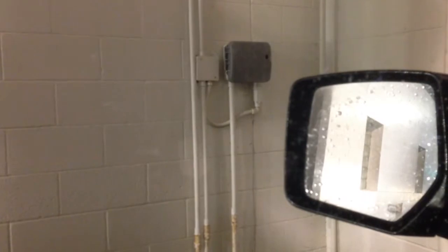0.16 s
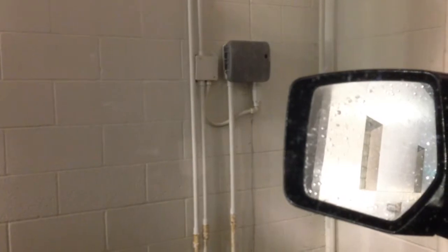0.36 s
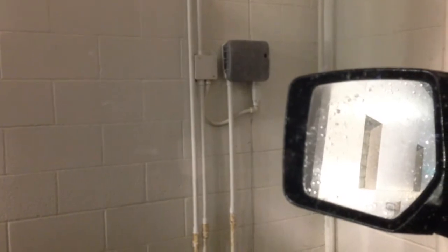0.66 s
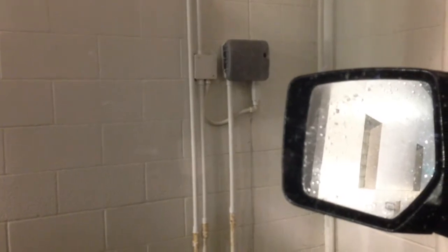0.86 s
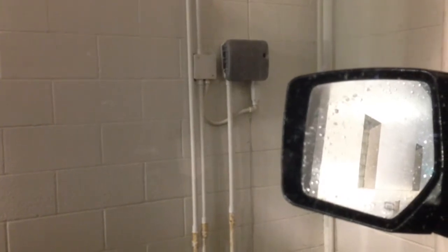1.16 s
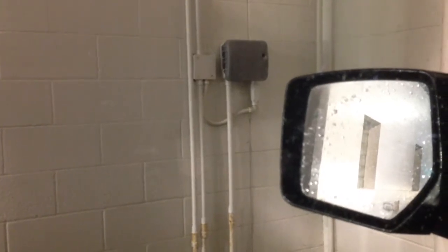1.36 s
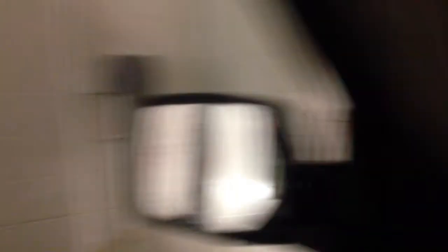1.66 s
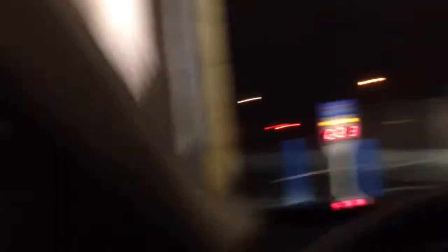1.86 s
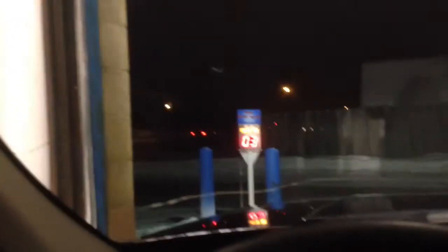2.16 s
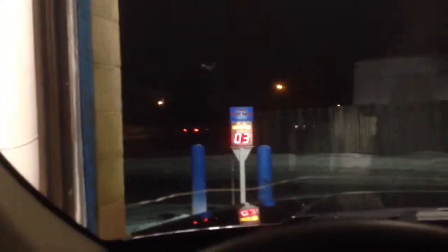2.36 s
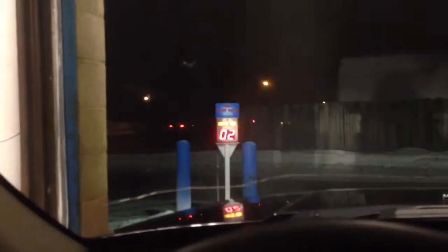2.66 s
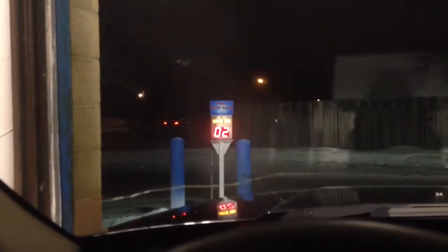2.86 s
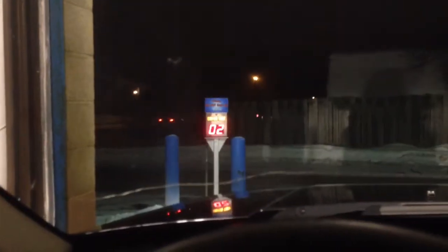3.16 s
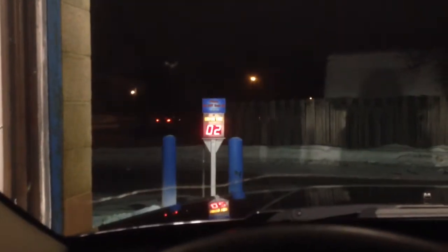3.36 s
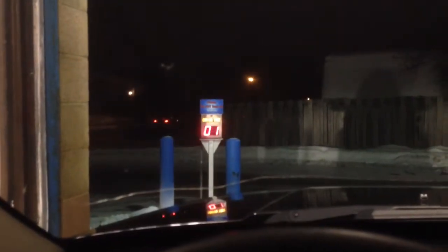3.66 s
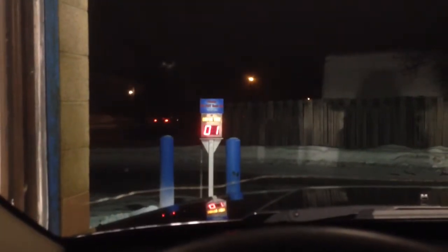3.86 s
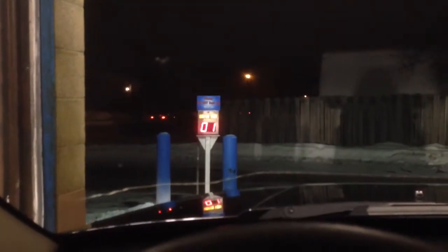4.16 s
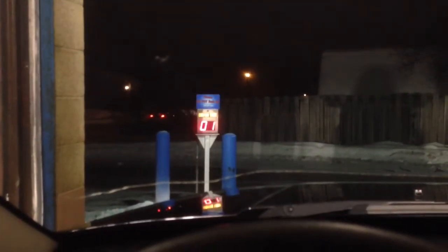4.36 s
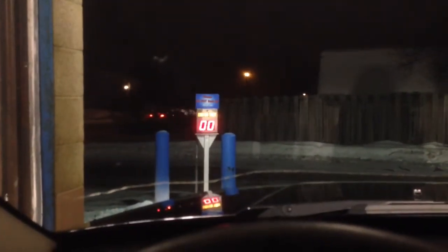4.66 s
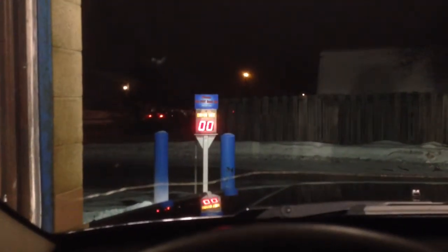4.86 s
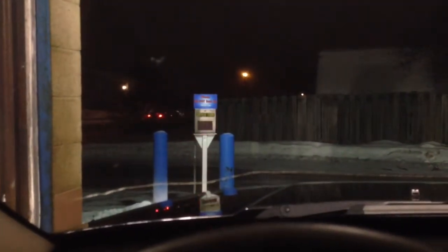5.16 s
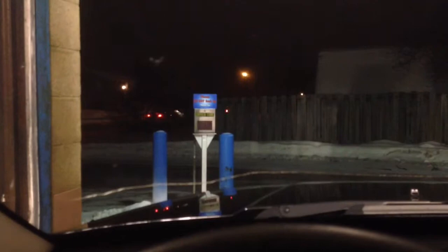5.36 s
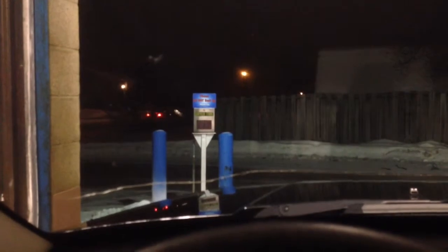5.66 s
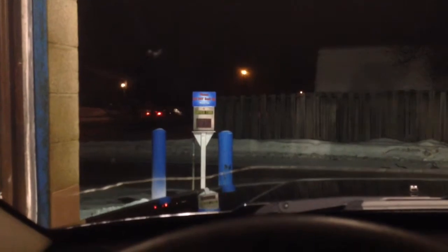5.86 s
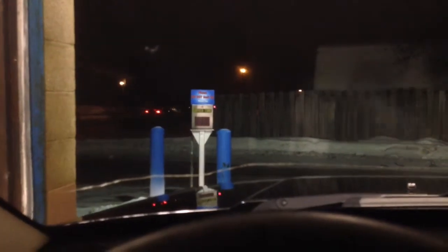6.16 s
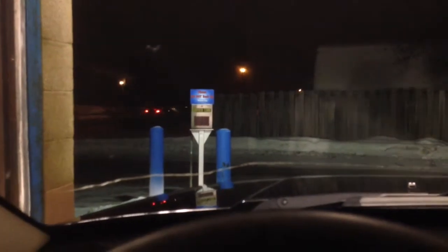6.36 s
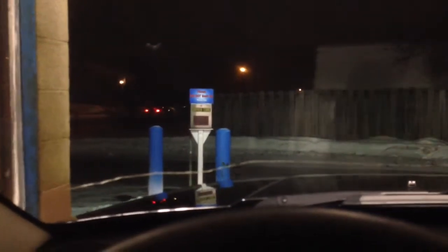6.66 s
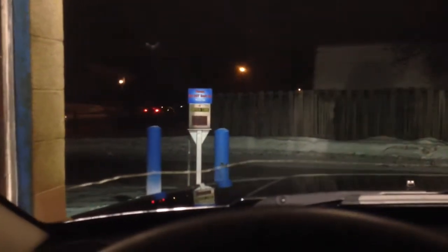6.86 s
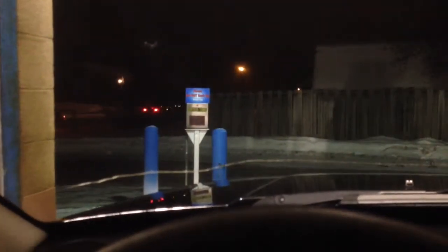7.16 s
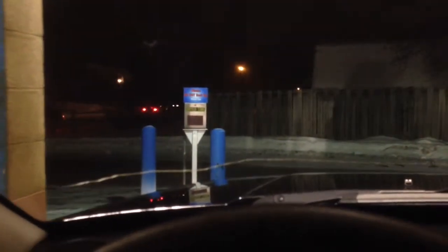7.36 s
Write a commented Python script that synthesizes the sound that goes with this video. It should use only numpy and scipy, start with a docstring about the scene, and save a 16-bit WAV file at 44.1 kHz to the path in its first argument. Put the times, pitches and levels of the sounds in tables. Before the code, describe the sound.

A continuous low-heavy blower roar in a small car cabin, bass throbbing loosely with short swells. Softer mid-range rushing, blurred blower whine and faint high hiss sit behind it, with tiny water drops ticking almost unnoticed. The tone changes briefly as the handheld microphone turns forward; later the car leaves the jets, the patter dies, the hiss dulls and the whole sound sinks without stopping.

```python
"""Air-dryer jets of a car wash buffet a car as it creeps out, heard from the driver's seat.
Buffeting: noise in the cabin modes, with short swells. Rush and seal hiss: coloured, fluttering noise.
Fan tones: narrow noise bands that flare. Blown drops: short noise bursts and a fine random patter.
The microphone swings from side window to windscreen; the rush changes colour, the hiss dulls, and both fade.
A faint even noise floor lies beneath; a limiter and a band limit follow."""
import sys
import numpy as np
from scipy import signal
from scipy.fft import rfft, irfft
from scipy.io import wavfile
from scipy.ndimage import uniform_filter1d, minimum_filter1d

SR = 44100
rng = np.random.default_rng(int(sys.argv[2]) if len(sys.argv) > 2 else 0)


def store_wav(level_fs):
    """Save 16-bit WAV to argv[1]."""
    pcm = np.round(np.clip(np.atleast_2d(level_fs), -1, 1) * 32767)
    wavfile.write(sys.argv[1], SR, pcm.T.astype(np.int16))


N = 330750

# Cabin and panel modes: (centre [Hz], width [Hz], side-window level [dB], windscreen level [dB])
CABIN_MODES = [(91.5, 21, -5.5, -11.5), (116.7, 13, 2.5, -1.5), (132.9, 14, 0.9, 2.3), (157.5, 16, 4, 1),
               (175.7, 26.3, -8, -3.5), (198.2, 14, -10, -11), (232, 45, -9, -30), (268, 63, -19.5, -33),
               (342.6, 42, -19, -31)]
# Loudest short swells of the boom: (centre [s], lift [dB])
BOOM_SWELLS = [(.04, 3.5), (.32, 7.5), (1.11, 3), (1.23, 5.5), (2.23, 5), (3.75, 5), (4.51, 8), (5.56, 2),
               (5.73, 5), (5.96, 4)]
# Lowest cabin mode and its skirts: (frequency [Hz], relative density [dB per Hz])
HEAVE_SPECTRUM = [(8, -38), (20, -25), (34, -19), (45, -8.5), (56, 1.5), (63, -8), (70, -7), (82, -4.5),
                  (105, -21.5), (200, -53.5)]
# Loudest short swells of the lowest cabin mode: (centre [s], lift [dB])
HEAVE_SWELLS = [(2.58, 12.5), (2.8, 7.5), (4.04, 8), (4.16, 8.5), (4.75, 8), (5.97, 7)]
# Rush through the side window: (frequency [Hz], relative density [dB per Hz])
SIDE_RUSH_SPECTRUM = [(120, -19.5), (280, 0), (400, -1.5), (580, 3), (660, -5), (760, -1), (1050, -8),
                      (1400, -7.5), (1780, -8), (2200, -15), (2700, -20), (3700, -29.5), (6000, -45.5)]
# Rush through the windscreen: (frequency [Hz], relative density [dB per Hz])
FRONT_RUSH_SPECTRUM = [(120, -8), (240, 2), (340, 3.5), (520, .5), (740, -2), (870, -7), (1020, -7),
                       (1120, -10.5), (1450, -9), (1780, -10.5), (2200, -17), (2700, -21), (3700, -26.5),
                       (6000, -52.5)]
# Windscreen rush once clear of the jets: (frequency [Hz], change [dB])
FAR_RUSH_CHANGE = [(250, 0.67), (420, 2), (600, -0.79), (1100, 0.84), (2500, 0.18), (8000, 0)]
# Fan tones and bay ringing: (centre [Hz], width [Hz], side-window level over rush [dB],
# windscreen level over rush [dB], gain once clear of the jets [dB])
FAN_TONES = [(320, 57, -8.5, -1.5, 3), (450.6, 28, 0.5, 3, 6), (515, 15, 0, 3.5, -1.5),
             (603, 21, 3.5, 0, .5), (756, 32, -6.5, -1, 1), (928, 22, -10, 6, 0.5), (989, 30, -13, -1, 6),
             (1197, 36, 5, 1.5, 3), (1292, 28, -12.5, -4.5, 7), (1379, 35, -2.5, -1.5, 0),
             (1552, 33, -4, 7.5, 1.5), (1688, 47, -1.5, 4.5, 1.5), (1802, 51, -.5, 2, 2.5),
             (2075, 87, -11, -4, 3), (3147, 53, -1, 7.5, -3.5), (3680, 71, 9, -7, 8)]
# Air at the window seals: (frequency [Hz], relative density [dB per Hz])
HISS_SPECTRUM = [(1500, -20), (2600, -2), (3200, 1.5), (3800, -0.5), (4300, -4), (5000, -6), (6000, -11.5),
                 (7000, -15.5), (8500, -21), (10000, -26.5), (12000, -35), (15000, -42)]
# Seal hiss once clear of the jets: (frequency [Hz], change [dB])
FAR_HISS_CHANGE = [(2000, -1.5), (4000, -4.0), (7000, -4.5), (16000, -8.0)]
# Drops splashing on the car: (onset [s], crest level [dB], spectral centre [Hz])
DROP_SPLASHES = [(1.285, -58, 6000), (1.733, -54, 5700), (2.584, -50, 6300), (3.027, -57.5, 7000),
                 (3.855, -57.5, 7530), (4.169, -58, 7600), (5.025, -51, 6100), (5.08, -62, 7500),
                 (5.401, -60, 7000), (5.473, -64, 9500), (5.743, -57, 6900)]
# One small hard tick in the cabin: (onset [s], crest level [dB], spectral centre [Hz], decay [s])
HARD_TICK = (5.993, -50, 6500, .003)
# Fine droplet patter: (frequency [Hz], relative density [dB per Hz])
SPRAY_SPECTRUM = [(2000, -17.5), (5000, 1.5), (9000, -0.5), (15000, -8.0)]

# Microphone swing; roll-out from under the jets; shading of the dryer by the doorway
TURN_START_S, TURN_LENGTH_S = 1.5, 0.45
LEAVE_START_S, LEAVE_LENGTH_S = 4.89, 1.33
DOOR_START_S, DOOR_LENGTH_S = 6.92, 0.31

# Per layer: base level, fade while rolling away, loss past the doorway
BOOM_DB, BOOM_FADE_DB_PER_S, BOOM_DOOR_LOSS_DB = -16, 3, 2.5
HEAVE_DB, HEAVE_FADE_DB_PER_S, HEAVE_DOOR_LOSS_DB = -24.5, 0.8, 1
RUSH_DB, RUSH_FADE_DB_PER_S, RUSH_DOOR_LOSS_DB = -34, 2.5, 1
FANS_DB, FANS_FADE_DB_PER_S, FANS_DOOR_LOSS_DB = -33.5, 2.5, 9
HISS_DB, HISS_FADE_DB_PER_S, HISS_DOOR_LOSS_DB = -49.5, 3, -0.1
FLOOR_DB = -67.5

RUSH_FRONT_GAIN_DB, FANS_FRONT_GAIN_DB = 3.5, 3  # windscreen over side window
FAN_FLARE_DB = 1.6
BOOM_SWELL_LENGTH_S, HEAVE_SWELL_LENGTH_S = 0.063, 0.09
LONG_SWELL_CENTRE_S, LONG_SWELL_LENGTH_S, LONG_SWELL_DB = 4.3, 0.42, 2.2  # before leaving the jets
DROP_RISE_S, DROP_DECAY_S, DROP_OCTAVES = 0.005, 0.011, 0.61
SPRAY_DECAY_S = 0.0055  # decay of the power
CEILING_DB, LIMITER_S, BAND_EDGE_HZ = -3, 0.02, 15300


def boom(hz):
    """Buffeting drives the cabin modes; each place in the cabin hears its own mix of them."""
    side_power = sum(gain_of(db) ** 2 * bell(hz, f, w) for f, w, db, _ in CABIN_MODES)
    front_power = sum(gain_of(db) ** 2 * bell(hz, f, w) for f, w, _, db in CABIN_MODES)
    side = noise(np.sqrt(side_power))
    front = noise(np.sqrt(front_power))
    modes = sustained(blend(side, front, facing()), seconds=0.09, share=0.52)
    short_swells_db = swells(BOOM_SWELLS, BOOM_SWELL_LENGTH_S)
    long_swell_db = swells([(LONG_SWELL_CENTRE_S, LONG_SWELL_DB)], LONG_SWELL_LENGTH_S)
    throb_db = throb(hz, rate_hz=5, width_hz=3.8, depth_db=0.77)
    distance_db = receding(BOOM_FADE_DB_PER_S, BOOM_DOOR_LOSS_DB)
    return gain_of(BOOM_DB + short_swells_db + long_swell_db + throb_db + distance_db) * modes


def throb(hz, rate_hz, width_hz, depth_db):
    """Level change in dB: the jets flap against the body in a loose rhythm."""
    return depth_db * noise(np.sqrt(bell(hz, rate_hz, width_hz)))


def heave(hz):
    """The whole cabin's air heaves in its lowest mode, with a few short swells."""
    air = sustained(noise(read(HEAVE_SPECTRUM, hz)), seconds=0.18, share=1.0)
    swells_db = swells(HEAVE_SWELLS, HEAVE_SWELL_LENGTH_S)
    distance_db = receding(HEAVE_FADE_DB_PER_S, HEAVE_DOOR_LOSS_DB)
    return gain_of(HEAVE_DB + swells_db + distance_db) * air


def rush(hz):
    """The jets' roar through the glass the microphone faces; its colour shifts slightly on leaving."""
    near_gain = read(FRONT_RUSH_SPECTRUM, hz)
    far_gain = near_gain * read(FAR_RUSH_CHANGE, hz)
    front = blend(noise(near_gain), noise(far_gain), leaving())
    side = noise(read(SIDE_RUSH_SPECTRUM, hz))
    roar = blend(side, gain_of(RUSH_FRONT_GAIN_DB) * front, facing())
    level_db = RUSH_DB + receding(RUSH_FADE_DB_PER_S, RUSH_DOOR_LOSS_DB)
    return gain_of(level_db) * eddies(roar, patchy_db=0.94, overall_db=0.3)


def fans(hz):
    """Fuzzy tones that flare in the moving air; their balance shifts as the car leaves the jets."""
    glass, clear, turned = read(FRONT_RUSH_SPECTRUM, hz), leaving(), facing()
    tones = np.zeros(N)
    for centre_hz, width_hz, side_db, front_db, clear_db in FAN_TONES:
        colour = glass * np.exp(-2 * np.log(2) * ((hz - centre_hz) / width_hz) ** 2)
        # a narrow tone holds little of the roar's power
        share = np.sqrt(np.sum(colour ** 2) / np.sum(glass ** 2))
        tone_db = side_db + (front_db - side_db) * turned + clear_db * clear
        flare_db = FAN_FLARE_DB * wander(seconds=0.1)
        tones += share * gain_of(tone_db + flare_db) * noise(colour)
    distance_db = receding(FANS_FADE_DB_PER_S, FANS_DOOR_LOSS_DB)
    return gain_of(FANS_DB + FANS_FRONT_GAIN_DB * turned + distance_db) * tones


def hiss(hz):
    """Air tearing past the seals, duller as the jets fall behind."""
    near_gain = read(HISS_SPECTRUM, hz)
    far_gain = near_gain * read(FAR_HISS_CHANGE, hz)
    air = blend(noise(near_gain), noise(far_gain), leaving())
    level_db = HISS_DB + receding(HISS_FADE_DB_PER_S, HISS_DOOR_LOSS_DB)
    return gain_of(level_db) * eddies(air, patchy_db=0.92, overall_db=0.05)


def ticks():
    """Soft splashes of drops, and one harder tick."""
    splashes = sum(burst(*row, DROP_DECAY_S, DROP_OCTAVES, DROP_RISE_S) for row in DROP_SPLASHES)
    return splashes + burst(*HARD_TICK, octaves=0.3, rise_s=0.001)


def burst(onset_s, db, centre_hz, decay_s, octaves, rise_s):
    """A short puff of bright noise that swells and dies away."""
    t = np.arange(4096) / SR
    hz = np.fft.rfftfreq(len(t), 1 / SR)
    colour = np.exp(-0.5 * (np.log2((hz + 1) / centre_hz) / octaves) ** 2)
    puff = evened(irfft(rfft(rng.standard_normal(len(t))) * colour))
    envelope = (1 - np.exp(-(t / rise_s) ** 2)) * np.exp(-t / decay_s)
    sound = gain_of(db) * puff * envelope / envelope.max()
    return np.pad(sound, (max(round(onset_s * SR), 0), N))[:N]


def spray(per_s, db, spread_db):
    """Fine droplets patter at random under the jets and die out as the car leaves them."""
    draws = rng.random((400, 2))[:int(per_s * N / SR)]
    onset = (draws[:, 0] * (N - 1)).astype(int)
    size = gain_of(db + spread_db * draws[:, 1])
    hits = np.bincount(onset, size ** 2, N) * (1 - leaving())
    power = signal.lfilter([1], [1, -np.exp(-1 / (SPRAY_DECAY_S * SR))], hits)
    return np.sqrt(power) * noise(read(SPRAY_SPECTRUM, np.fft.rfftfreq(N, 1 / SR)))


def noise_floor():
    """Faint steady white noise."""
    return gain_of(FLOOR_DB) * rng.standard_normal(N)


def facing():
    """Where the microphone points: 0 at the side window, 1 at the windscreen."""
    return ramp(TURN_START_S, TURN_LENGTH_S)


def leaving():
    """Where the car is: 0 under the jets, 1 clear of them."""
    return ramp(LEAVE_START_S, LEAVE_LENGTH_S)


def receding(fade_db_per_s, door_loss_db):
    """Level change in dB: a steady fade as the car rolls away, and a short ramp past the doorway."""
    rolled_s = np.maximum(np.arange(N) / SR - LEAVE_START_S, 0)
    return -fade_db_per_s * rolled_s - door_loss_db * ramp(DOOR_START_S, DOOR_LENGTH_S)


def swells(rows, length_s):
    """Level change in dB: each swell rises and falls in one smooth arch."""
    return sum(db * np.sin(np.pi * ramp(s - length_s / 2, length_s)) ** 2 for s, db in rows)


def ramp(start_s, length_s):
    """A move from 0 to 1 at even speed."""
    return np.clip((np.arange(N) / SR - start_s) / length_s, 0, 1)


def wander(seconds):
    """A slow random drift of rms 1."""
    size = max(int(seconds * SR), 2)
    drift = uniform_filter1d(rng.standard_normal(N), size, mode="wrap")
    return evened(uniform_filter1d(drift, size, mode="wrap"))


def eddies(x, patchy_db, overall_db):
    """Turbulence lifts and drops patches of the spectrum, and the whole of it together."""
    z = signal.stft(x, nperseg=512)[2]
    patch_shape = np.outer(np.hanning(11), np.hanning(17))  # frequency bins by frames
    patches = evened(signal.fftconvolve(rng.standard_normal(z.shape), patch_shape, "same"))
    overall = evened(uniform_filter1d(rng.standard_normal(z.shape[1]), size=14))
    return signal.istft(z * gain_of(patchy_db * patches + overall_db * overall), nperseg=512)[1][:N]


def sustained(x, seconds, share):
    """Evens out part or all of the slow swells of a noise and keeps its fast flutter."""
    size = max(int(seconds * SR), 2)
    power = uniform_filter1d(uniform_filter1d(x ** 2, size), size)
    return evened(x / (abs(power) + 1e-9) ** (np.clip(share, 0, 1) / 2))


def blend(a, b, share):
    """Crossfades two unrelated noises at constant power."""
    share = np.clip(share, 0, 1)
    return np.sqrt(1 - share) * a + np.sqrt(share) * b


def noise(gain):
    """Noise of rms 1 with the given amplitude spectrum."""
    return evened(irfft(rfft(rng.standard_normal(N)) * gain, N))


def bell(hz, centre_hz, width_hz):
    """Power response of a steep-sided resonance."""
    return 1 / (1 + (hz - centre_hz) ** 2 / (width_hz / np.sqrt(2)) ** 2) ** 2


def read(points, hz):
    """Gain of a spectrum whose points are joined on a log-frequency axis."""
    f, db = np.transpose(points)
    return gain_of(np.interp(np.log(hz + 1), np.log(f + 1), db, right=-120))


def evened(x):
    """Scales to rms 1."""
    return x / np.sqrt(np.mean(x ** 2) + 1e-20)


def gain_of(db):
    """Decibels to amplitude."""
    return 10 ** (np.asarray(db) / 20)


def scene():
    """Boom, heave, rush, fan tones, hiss and drops over the noise floor."""
    hz = np.fft.rfftfreq(N, 1 / SR)
    jets = boom(hz) + heave(hz) + rush(hz) + fans(hz) + hiss(hz)
    drops = ticks() + spray(per_s=12, db=-70, spread_db=10.5)
    return (jets + drops + noise_floor())[None]


def record(dry):
    """The recorder's limiter ducks the tallest peaks; then its band limit."""
    size = int(LIMITER_S * SR)
    allowed = np.minimum(gain_of(CEILING_DB) / (abs(dry) + 1e-9), 1)
    held = dry * uniform_filter1d(minimum_filter1d(allowed, size), size)
    lowpass = signal.firwin(511, BAND_EDGE_HZ, window=("kaiser", 9), fs=SR)
    return signal.oaconvolve(held, lowpass[None], "same")


dry = scene()
out = record(dry)
store_wav(out)
```